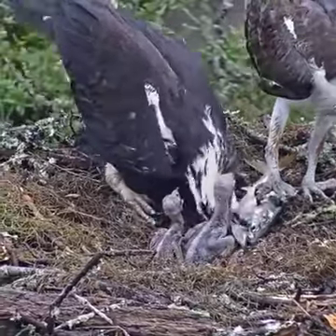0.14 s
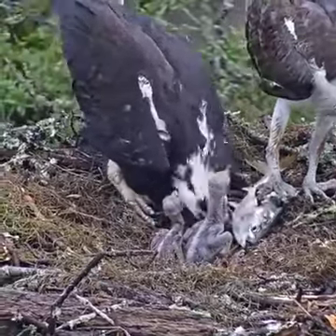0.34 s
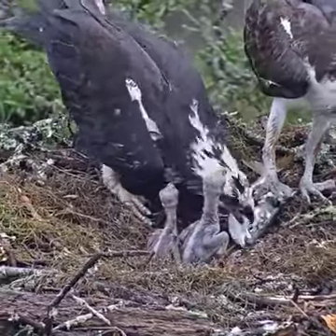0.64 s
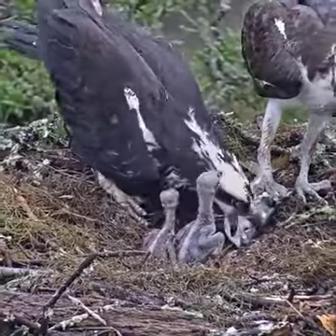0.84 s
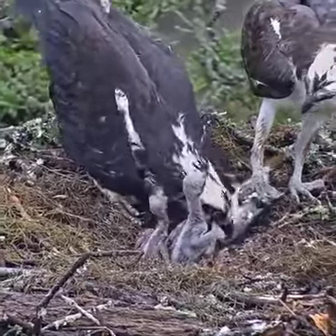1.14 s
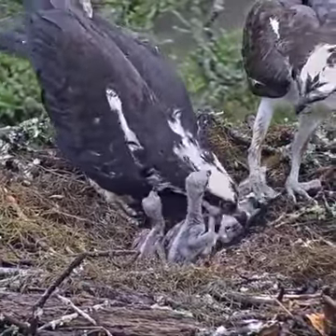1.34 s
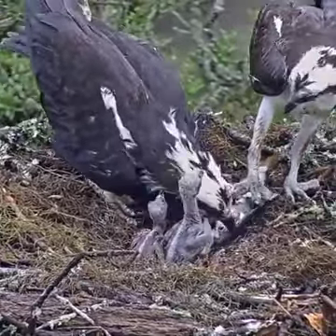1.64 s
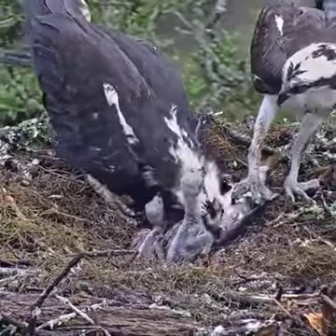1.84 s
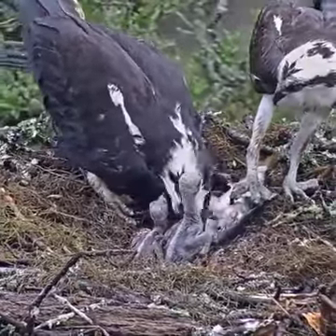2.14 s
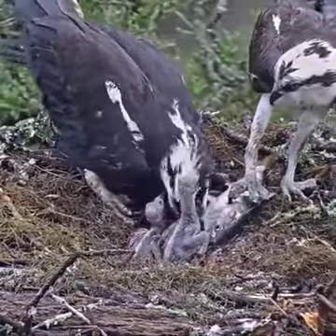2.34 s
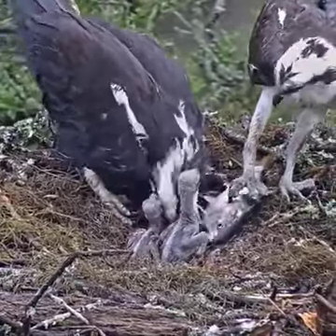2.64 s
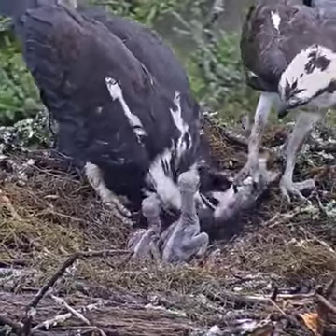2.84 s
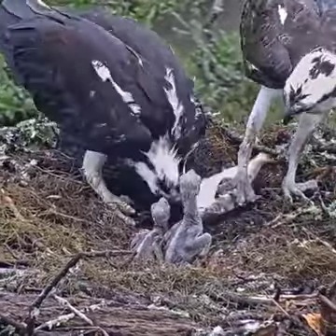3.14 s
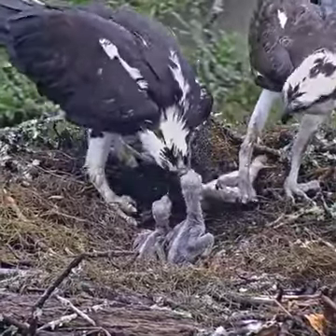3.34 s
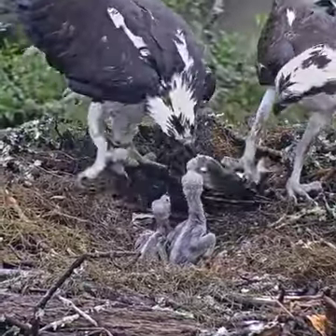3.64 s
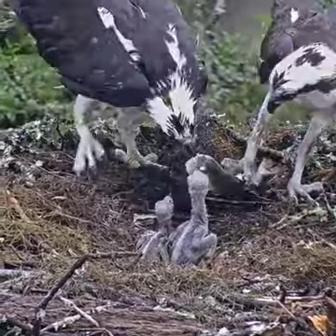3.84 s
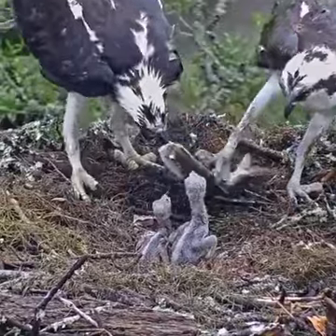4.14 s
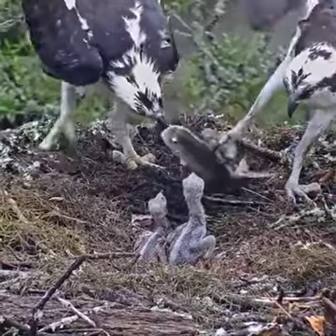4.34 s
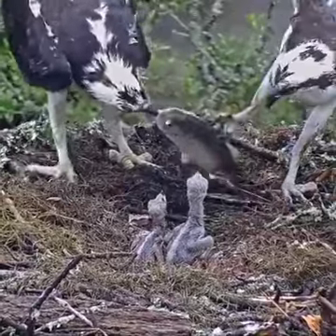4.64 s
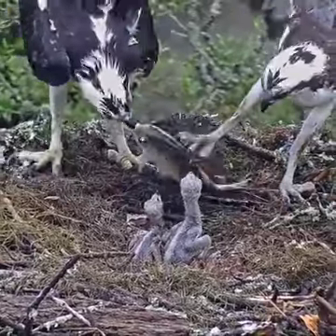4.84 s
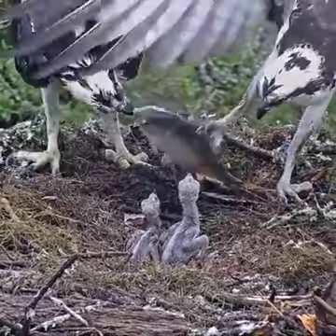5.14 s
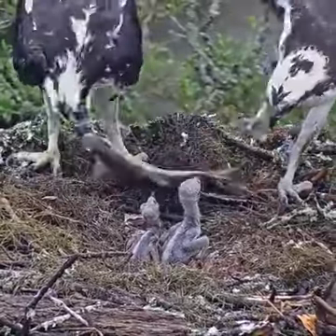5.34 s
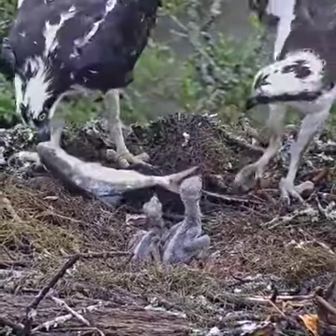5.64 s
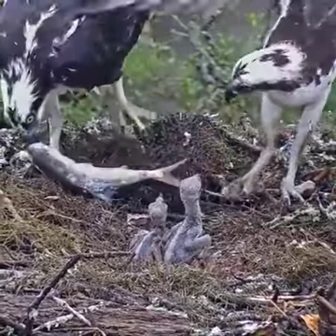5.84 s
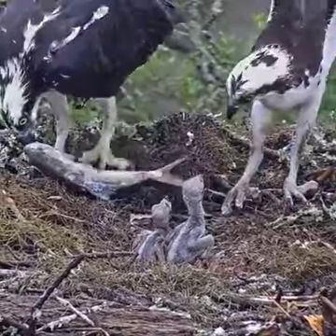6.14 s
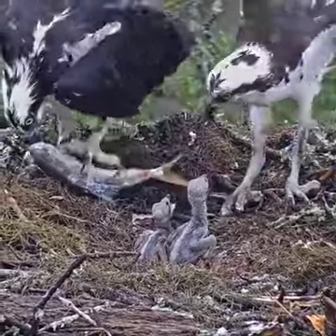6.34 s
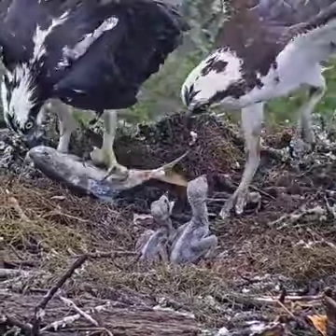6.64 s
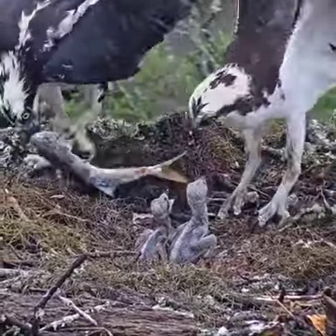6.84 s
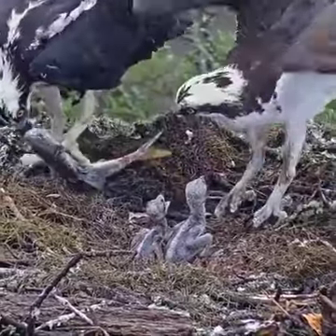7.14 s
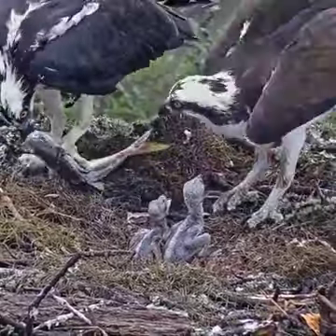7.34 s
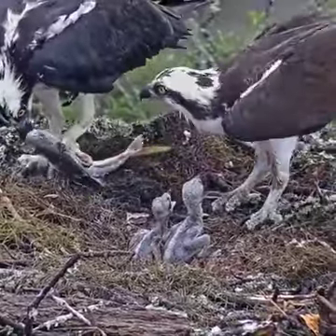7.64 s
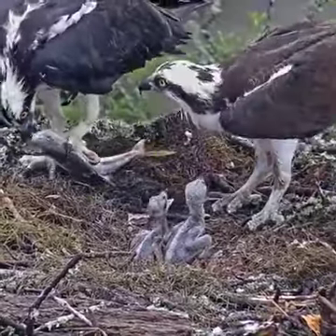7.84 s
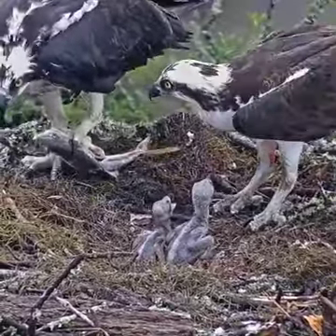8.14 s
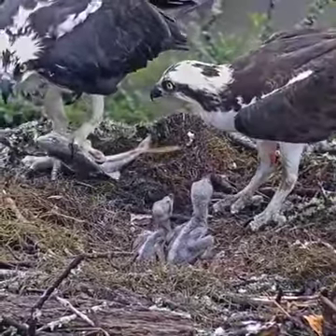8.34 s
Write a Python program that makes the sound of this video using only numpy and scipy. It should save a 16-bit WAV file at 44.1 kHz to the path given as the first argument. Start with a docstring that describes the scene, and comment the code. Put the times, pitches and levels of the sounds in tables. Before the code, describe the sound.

Ospreys at a stick nest whistle sharply, flipping between two pitches, over chick peeps, a toad's pulsed trill and steady hiss.

```python
"""Ospreys squabbling on a stick nest

Chicks peep, something scrapes and snaps with a hard ring, adults whistle and yelp: birds are jittered near-sine
notes, scrapes and snaps are struck resonances. Whistles flip abruptly between two registers. In the marsh
below, a toad trills as a pulsed tone over a far chorus of peeps; filtered noise and sines make hiss and hum. A
clipping microphone, a gain control that lifts quiet passages and a lopsided amplifier colour it all."""
import sys
import numpy as np
from scipy import signal
from scipy.fft import rfft, irfft, next_fast_len
from scipy.io import wavfile
from scipy.ndimage import uniform_filter1d, minimum_filter1d

SR = 44100
rng = np.random.default_rng(int(sys.argv[2]) if len(sys.argv) > 2 else 0)


def store_pcm(level_fs):
    """Save levels as 16-bit WAV."""
    pcm = np.round(np.clip(level_fs, -1, 1) * 32767).astype(np.int16)
    wavfile.write(sys.argv[1], SR, np.atleast_2d(pcm).T)


N = 374409
TIME = np.arange(N) / SR


def from_db(db):
    """Decibels to amplitude factor."""
    return 10 ** (np.asarray(db) / 20)


def rms_one(x):
    """Scale to rms 1."""
    return x / np.sqrt(np.mean(x ** 2) + 1e-20)


def filtered(x, kind, hz, order=2):
    """Butterworth filter."""
    return signal.sosfilt(signal.butter(order, hz, kind, fs=SR, output="sos"), x)


def drift(hz, size=N):
    """Random wander below a cutoff, spread about 1."""
    return rms_one(filtered(rng.standard_normal(size + SR), "low", hz))[SR:]


def noise(spectrum):
    """Gaussian noise with the given spectral shape; rms 1."""
    hz, db = np.transpose(spectrum)
    size = next_fast_len(N)
    bins_hz = np.maximum(np.fft.rfftfreq(size, 1 / SR), 1)
    colour = from_db(np.interp(np.log(bins_hz), np.log(hz), db))
    return rms_one(irfft(colour * rfft(rng.standard_normal(size)))[:N])


def add(track, start_s, sound):
    """Mix a sound into a track in place."""
    at = max(round(start_s * SR), 0)
    track[at:at + len(sound)] += sound[:N - at]


def clock(length_s):
    """Seconds since the start of a note; at least 5 ms long."""
    return np.arange(max(round(length_s * SR), SR // 200)) / SR


def arch(three, t):
    """A parabola through the values at start, middle and end."""
    return np.polyval(np.polyfit([0, .5, 1], three, 2), t / t[-1])


def note(t, pitch_hz, level_db, overtones_db, jitter, flutter_db, flutter_hz, edge_s):
    """One syrinx note: fundamental plus weighted harmonics, with random pitch jitter and level flutter."""
    phase = 2 * np.pi * np.cumsum(pitch_hz * (1 + jitter * drift(220, len(t)))) / SR
    tone = np.sin(phase)
    for k, db in enumerate(overtones_db, 2):
        tone = tone + from_db(db) * np.sin(k * phase)
    to_edge_s = np.minimum(t, t[-1] - t)
    gate = np.sin(np.pi / 2 * np.clip(to_edge_s / edge_s, 0, 1)) ** 2
    return np.sqrt(2) * tone * gate * from_db(level_db + flutter_db * drift(flutter_hz, len(t)))


def echoes(x, t60_s, delay_s):
    """Scattered, dying reflections from branches and trees: convolution with decaying noise."""
    t = np.arange(SR) / SR
    tail = rng.standard_normal(SR) * from_db(-60 * t / t60_s) * (t > delay_s)
    return signal.fftconvolve(x, tail / np.linalg.norm(tail))[:N]


# Chick peeps, nominal: (start [s], end [s], mid pitch [Hz], glide from start to end [Hz],
# level [dB], hoarseness [0-1])
CHICK_PEEPS = [(0, .079, 2790, -30, -29.5, 0), (.085, .13, 2620, -250, -34, .24),
               (.123, .238, 2570, 0, -40, .88), (.238, .305, 3100, 0, -47, 1),
               (.338, .465, 2770, -240, -33, .2), (.471, .577, 2760, -30, -42.5, .5),
               (.487, .518, 2330, -200, -44, .2), (1.32, 1.41, 2750, 100, -42, .5),
               (3.12, 3.262, 3000, 1000, -54, .35), (3.266, 3.44, 3450, 700, -53.5, .18),
               (3.29, 3.45, 2790, -40, -46, .11), (3.749, 3.818, 3150, -100, -37, 0),
               (3.863, 3.896, 2450, -60, -28, .65), (4.048, 4.11, 3400, 30, -34.5, .2),
               (4.175, 4.199, 2560, 200, -31, .42), (4.355, 4.463, 3200, -200, -37.5, .12),
               (4.514, 4.543, 2520, -500, -31.5, .6), (4.885, 4.965, 2800, -110, -29.5, .19),
               (5.405, 5.5, 3190, 600, -40, 1), (5.987, 6.041, 3250, 1200, -41, 1),
               (6.264, 6.343, 3100, 900, -41, 1), (7.09, 7.23, 3000, 700, -48.5, .35),
               (7.24, 7.347, 3500, 370, -48.5, .3), (7.415, 7.445, 3400, -700, -48.5, .3),
               (7.474, 7.542, 2600, 290, -50, .36), (7.88, 7.97, 3780, 0, -56, .3),
               (7.9, 7.97, 2640, 100, -46, .5), (7.69, 7.782, 2690, -60, -44, .15),
               (7.805, 7.856, 2430, -280, -45, .3), (7.987, 8.045, 3560, 0, -47.5, .2),
               (8.02, 8.09, 2770, 0, -42, .2), (8.098, 8.148, 2730, -200, -37.5, .3),
               (8.16, 8.33, 2690, -100, -43, .55), (8.09, 8.138, 3430, 0, -49, .1),
               (8.153, 8.207, 2450, -370, -43.5, .3), (8.155, 8.21, 3530, 400, -48, .3),
               (8.22, 8.385, 4230, -200, -59, .3), (8.35, 8.438, 3140, 250, -35, .25),
               (8.357, 8.48, 2780, -60, -37.5, .2)]
REST_HZ, PEEP_ARCH = 2600, .4   # a peep's ends hang back towards the resting pitch by this share


def chicks(quaver_db=2.5, quaver_hz=120, overtone_db=-28):
    """Thin arched peeps with an uneven quaver; fast random pitch wobble makes them hoarse."""
    out = np.zeros(N)
    for start_s, end_s, hz, glide_hz, db, hoarse in CHICK_PEEPS:
        t = clock(end_s - start_s + .009)
        ends_hz = hz - PEEP_ARCH * (hz - REST_HZ)
        pitch_hz = arch([ends_hz - glide_hz / 2, hz, ends_hz + glide_hz / 2], t)
        level_db = db + arch([-3, 1, -4.5], t)
        wobble = .003 + .07 * hoarse ** 2
        add(out, start_s - .004, note(t, pitch_hz, level_db, [overtone_db], jitter=wobble,
                                      flutter_db=quaver_db, flutter_hz=quaver_hz, edge_s=.009))
    return out


# Hiss spectral shape: (frequency [Hz], relative density [dB])
HISS_SHAPE = [(25, -10.5), (60, -0.5), (150, -4), (400, -4), (850, -6.5), (1250, -13), (1750, -11),
              (2300, 2), (2750, 6), (3700, -4), (4600, -20), (7000, -27.5), (8600, -52.5), (15000, -58)]
# Electrical hum, before the gain control: (frequency [Hz], rms level [dB])
HUM_TONES = [(102.3, -65), (204.6, -72), (290.7, -70), (349.9, -70.5), (409.1, -74.5), (538.3, -71.5),
             (721.4, -81.5), (818.3, -79), (962, -71), (1558, -87.5)]
HISS_DB = -49.7


def background():
    """Hiss peaking near 2.7 kHz with a slow level waver, plus hum sines with wandering phase."""
    hum = np.zeros(N)
    for hz, db in HUM_TONES:
        cycles = hz * TIME + rng.random()
        hum += from_db(db) * np.sqrt(2) * np.sin(2 * np.pi * cycles + 0.78 * drift(4))
    return from_db(HISS_DB + 0.41 * drift(9.2)) * noise(HISS_SHAPE) + hum


CHORUS_DB = -55.5


def chorus(centre_hz=2730, spread=.022, count=170):
    """Many far, small peeps overlap around one pitch; rms 1."""
    out, t = np.zeros(N), clock(.093)
    for when, (tuning, glide, strength) in zip(rng.random(count), rng.standard_normal((count, 3))):
        pitch_hz = centre_hz * (1 + spread * tuning + .02 * glide * arch([1, 0, -1], t))
        level_db = 2 * strength + arch([-3, 0, -3], t)
        add(out, when * N / SR, note(t, pitch_hz, level_db, [-26], jitter=.005,
                                     flutter_db=4, flutter_hz=120, edge_s=0.013))
    return rms_one(out)


# Ringing resonances, struck or scraped: (frequency [Hz], relative level [dB], t60 [s])
RING_MODES = [(956, -18, 0.07), (1526, -20.5, 0.17), (1830, -23, 0.018), (2003, -15, 0.036),
              (2400, 6, 0.0058), (2740, -4, 0.0076), (3600, -11.5, 0.006), (5760, -21.5, .003)]


def ring(clicks):
    """Parallel two-pole resonators rung by clicks."""
    out = np.zeros(N)
    for hz, db, t60_s in RING_MODES:
        r, w = from_db(-60 / (t60_s * SR)), 2 * np.pi * hz / SR
        poles = [1, -2 * r * np.cos(w), r * r]
        out += from_db(db) * signal.lfilter([0, np.sin(w)], poles, clicks + 1e-18)
    return out


# Scraping rubs: (start [s], end [s], nominal peak level [dB])
SCRAPES = [(0.08, 0.273, -53), (0.26, 0.386, -45.5), (1.03, 1.15, -39), (1.298, 1.47, -46),
           (3.03, 3.135, -53), (5.515, 5.69, -54), (7.38, 7.433, -50)]
# Single sharp snaps that ring the same modes: (time [s], relative strength [dB])
SNAPS = [(1.117, -21), (3.129, -33.5), (6.02, -42), (6.878, -41.5), (7.388, -38.5), (7.396, -40),
         (7.404, -36), (7.414, -38), (8.15, -38)]


def scrapes_and_snaps(slips_per_s=900):
    """Dense random slips (scrapes) and single clicks (snaps) excite the same ringing modes."""
    snaps, pressure = np.zeros(N), np.zeros(N)
    for start_s, db in SNAPS:
        add(snaps, start_s, from_db([db]) / 2)
    for start_s, end_s, db in SCRAPES:
        size = max(round((end_s - start_s) * SR), 2)
        add(pressure, start_s, from_db(db) * np.hanning(size))
    slips = (rng.random(N) < slips_per_s / SR) * rng.standard_normal(N)
    return ring(snaps) + pressure * rms_one(ring(slips))


# Per register, shares of the pitch: it scoops up as the breath builds and droops as it runs out
SCOOP, HIGH_SCOOP, DROOP = .085, .03, .095


def bend(share, scoop, droop):
    """Pitch factor on the way through one register: a scoop up, a plateau, a droop."""
    share = np.clip(share, 0, 1)
    return 1 - scoop * (1 - share) ** 2.5 - droop * share ** 5


ACCENT_S, SWELL_DB, SWELL_S = .016, 6, .013   # decay of the opening accent; swell to full strength
RELEASE_DB, RELEASE_S, WAVER_DB = 12, .011, .8   # the breath gives out at the end; slow unevenness
BREAK_S, BREAK_DIP_DB, BREAK_DIP_S = .0015, 6, .004   # sudden flip; the voice falters around the flip up
SECOND_DB, HIGH_PURER_DB = -29.5, 3   # second harmonic; the high register has less of it
SAG_AT, SAG_WIDTH = .35, .27   # where a held high note sags, shares of its length
# Flipping back lands on a quickly dying pop; level relative to the high register
TAIL_HZ, TAIL_DB, TAIL_FADE_DB_PER_S = 2600, 1, 400


def whistle(start_s, end_s, hz, db, accent_db, bow, *flip):
    """One call: it starts in the low register and may break into the high one and back."""
    t = clock(end_s - start_s + .003)
    now_s = start_s + t
    pitch_hz = hz * bend(t / t[-1], bow * SCOOP, bow * DROOP)
    second_db = SECOND_DB
    level_db = db + accent_db * np.exp(-t / ACCENT_S) - SWELL_DB * np.exp(-t / SWELL_S)
    if flip:
        up_s, back_s, high_hz, high_db, growth_db, sag = flip
        # crossfade weights of low register, high register and tail
        risen = np.clip((now_s - up_s) / BREAK_S + .5, 0, 1)
        fallen = np.clip((now_s - back_s) / BREAK_S + .5, 0, 1)
        low, high = 1 - risen, risen - fallen
        through = np.clip((now_s - up_s) / (back_s - up_s), 0, 1)
        since_back_s = now_s - back_s

        low_pitch_hz = hz * bend(t / (up_s - start_s), bow * SCOOP, 0)
        sagging = sag * np.exp(-((through - SAG_AT) / SAG_WIDTH) ** 2)
        high_pitch_hz = high_hz * (bend(through, HIGH_SCOOP, bow * DROOP) - sagging)
        tail_pitch_hz = TAIL_HZ * (1 - DROOP * since_back_s / (end_s - back_s))
        pitch_hz = low * low_pitch_hz + high * high_pitch_hz + fallen * tail_pitch_hz

        tail_db = TAIL_DB + min(growth_db, 0) - TAIL_FADE_DB_PER_S * since_back_s
        level_db = low * level_db + risen * high_db + high * growth_db * (through - .5) + fallen * tail_db
        level_db = level_db - BREAK_DIP_DB * np.exp(-np.abs(now_s - up_s) / BREAK_DIP_S)
        second_db = SECOND_DB - high * HIGH_PURER_DB
    level_db = level_db + WAVER_DB * drift(20, len(t)) - RELEASE_DB * np.exp((t - t[-1]) / RELEASE_S)
    return note(t, pitch_hz, level_db, [second_db], jitter=.0055,
                flutter_db=.45, flutter_hz=71, edge_s=.0045)


# Adult whistles, nominal: (start [s], end [s], pitch [Hz], level [dB], opening accent [dB],
# pitch bow [factor on scoop and droop]); if the call flips register, also: (flip up [s], flip back [s],
# high pitch [Hz], high level [dB], growth while high [dB], sag [share of high pitch])
ADULT_WHISTLES = [(0.795, 0.999, 2600, -24, 26, .8, 0.896, 0.992, 3510, -21.5, 10, 0),
                  (1.103, 1.288, 2640, -19, 0, 1.3, 1.132, 1.27, 3510, -19, -9, 0),
                  (1.421, 1.588, 2800, -19, 3, 1.4, 1.467, 1.578, 3610, -22, 0, .04),
                  (2.797, 3.03, 2650, -26, 9, 1, 2.882, 3.012, 3530, -21, 3, .01),
                  (3.45, 3.48, 2440, -16, 6, .2),
                  (3.476, 3.652, 2990, -16, 3, .6, 3.508, 3.633, 3350, -14.5, .5, .03),
                  (3.884, 4.047, 2700, -14, 0, .7, 3.994, 4.025, 3380, -14, -5, 0),
                  (4.194, 4.35, 2860, -12.5, 0, .9, 4.285, 4.337, 3465, -11.5, 0, 0),
                  (4.54, 4.69, 2855, -11.3, 0, 1.25),
                  (4.838, 5.006, 2850, -10.5, 0, 1.1, 4.882, 4.986, 3680, -14, 0, .1),
                  (5.164, 5.293, 2830, -11.7, 0, 1.1), (5.694, 5.87, 2815, -11.5, 0, .9),
                  (6.024, 6.184, 2825, -14.5, 0, 1, 6.125, 6.17, 3560, -14, 0, 0),
                  (6.353, 6.511, 2810, -15, 3, 1.1, 6.445, 6.499, 3550, -18.5, 10, 0),
                  (6.898, 7.021, 2598, -15.5, 8, .35)]


def whistles():
    """Near-pure syrinx calls, many breaking between two registers."""
    out = np.zeros(N)
    for row in ADULT_WHISTLES:
        add(out, row[0] - .002, whistle(*row))
    return out


# Low yelps, nominal: (start [s], end [s], mid pitch [Hz], mid level [dB],
# second harmonic re fundamental [dB])
ADULT_YELPS = [(0.81, 0.876, 2100, -29.5, 0.5), (1.95, 2.004, 2050, -30.5, 2), (2.977, 3.043, 2020, -37, 3),
               (4.048, 4.118, 2090, -31.5, -5.5), (5.503, 5.548, 1950, -40, 4.5),
               (7.541, 7.606, 2090, -27, -5)]
YELP_RISE, YELP_FALL = .005, .13   # start and end pitch below the middle, shares
YELP_ATTACK_DB, YELP_FADE_DB = 7, 11   # start and end level below the middle


def yelps():
    """Short notes, lower and richer in harmonics than the whistles, falling in pitch."""
    out = np.zeros(N)
    for start_s, end_s, hz, db, second_db in ADULT_YELPS:
        t = clock(end_s - start_s + .006)
        pitch_hz = hz * arch([1 - YELP_RISE, 1, 1 - YELP_FALL], t)
        level_db = db - arch([YELP_ATTACK_DB, 0, YELP_FADE_DB], t)
        add(out, start_s - .002, note(t, pitch_hz, level_db, [second_db, second_db - 31], jitter=0.0074,
                                      flutter_db=1.15, flutter_hz=90, edge_s=0.0059))
    return out


# Grit spectral shape: (frequency [Hz], relative density [dB])
GRIT_SHAPE = [(25, 12.5), (60, 10), (200, -17), (700, -10), (1400, -28), (2700, 5), (4200, -9.5),
              (6500, -13.5), (9000, -20), (15000, -32)]
GRIT_DB = -31.5   # re the voice


def adults():
    """Whistles and yelps, with faint noise following their short-term rms."""
    voice = whistles() + yelps()
    envelope = np.sqrt(np.abs(uniform_filter1d(voice ** 2, size=200)))
    return voice + from_db(GRIT_DB) * envelope * noise(GRIT_SHAPE)


TRILL_START_S, TRILL_END_S, TRILL_DB = 1.381, 5.56, -37.5
TRILL_ATTACK_S, TRILL_ATTACK_DB, TRILL_RELEASE_S, TRILL_FADE_DB_PER_S = .42, 20, .06, .9
TRILL_HZ, TRILL_RISE_HZ, TRILL_SAG_HZ_PER_S = 2155, 400, 20
# rate approached, surplus at the start, time scale of its loss
PULSES_PER_S, EXTRA_PULSES_PER_S, SLOWING_S = 53, 9.5, 1.05


def toad(pulse_share=0.5, far_db=-9, second_db=-25, third_db=-37, uneven=.02):
    """The vocal sac rings at one pitch, chopped into pulses; after swelling it slows, sags, fades and dulls."""
    age_s = np.maximum(TIME - TRILL_START_S, 0)
    slack = np.maximum(1 - age_s / TRILL_ATTACK_S, 0) ** 1.4   # the sac is still filling
    hz = TRILL_HZ - TRILL_RISE_HZ * slack - TRILL_SAG_HZ_PER_S * age_s
    effort = from_db(-TRILL_ATTACK_DB * slack - TRILL_FADE_DB_PER_S * age_s)
    per_s = PULSES_PER_S + EXTRA_PULSES_PER_S * np.exp(-(age_s / SLOWING_S) ** 2)
    cycle = np.cumsum(per_s * (1 + uneven * drift(30))) / SR % 1
    pulse = np.sin(np.pi * np.minimum(cycle / pulse_share, 1) ** 0.76) ** 1.3   # quick swell, slower fall
    phase = 2 * np.pi * np.cumsum(hz * (1 + .002 * drift(60))) / SR
    overtones = from_db(second_db) * np.sin(2 * phase) + from_db(third_db) * np.sin(3 * phase)
    tone = np.sin(phase) + effort * pulse * overtones
    gate = (age_s > 0) * np.clip((TRILL_END_S - TIME) / TRILL_RELEASE_S, 0, 1)
    trill = rms_one(pulse * tone) * effort * gate * from_db(TRILL_DB + 1.0 * drift(42))
    return trill + from_db(far_db) * echoes(trill, t60_s=0.22, delay_s=0.024)


def scene():
    """Nest with close echoes, marsh, and steady background."""
    nest = chicks() + scrapes_and_snaps() + adults()
    nest_echoes = from_db(-16.5) * echoes(nest, t60_s=.15, delay_s=0.0055)
    marsh = from_db(CHORUS_DB) * chorus() + toad()
    return (nest + nest_echoes + marsh + background())[None]


def microphone(x, limit=0.38, softness=.09, rumble_hz=45, top_hz=7500):
    """The capsule flattens loud swings on one side: whistles mix with the toad and thump at their edges."""
    flattened = softness * np.logaddexp(0, (-x - limit) / softness)
    return filtered(x + filtered(flattened, "high", rumble_hz), "low", top_hz, order=18)


def gain_control(x, knee_db=-15, slope=0.72, most_db=21, release_db_per_s=78, attack_hz=70):
    """Lifts quiet passages; gain drops in milliseconds, holds after sustained overload, climbs back."""
    def meter_db(size, origin):
        return 10 * np.log10(np.abs(uniform_filter1d(x ** 2, size, origin=origin)) + 1e-12)
    quick, slow, hold, overload_db = SR // 240, SR // 25 | 1, SR // 3 | 1, -15.8   # windows in samples
    # loudest sustained level of the last third of a second; discounted when below overload
    recent_db = -minimum_filter1d(-meter_db(slow, slow // 2), hold, origin=hold // 2)
    held_db = np.minimum(recent_db, recent_db + 8 * (recent_db - overload_db))
    level_db = np.maximum(meter_db(quick, 0), held_db)
    release_db = release_db_per_s * TIME
    level_db = np.maximum.accumulate(level_db + release_db) - release_db
    lift_db = np.clip(slope * (knee_db - level_db), 0, most_db)
    return x * from_db(lift_db[0] + filtered(lift_db - lift_db[0], "low", attack_hz, order=1))


def amplifier(x, lopsided=.09, straight_below=.1, rumble_hz=30, top_hz=7300):
    """Slightly lopsided stage: loud signals gain octave and difference tones."""
    bent = lopsided * (np.hypot(x, straight_below) - straight_below)
    return x + filtered(filtered(bent, "high", rumble_hz), "low", top_hz, order=12)


CUTOFF_HZ = 15700   # stopband edge


def record(dry, offset=-0.0058, self_noise_db=-81):
    """Microphone, gain control, amplifier, circuit noise, DC offset and a steep low-pass."""
    out = amplifier(gain_control(microphone(dry[0])))
    out = out + from_db(self_noise_db) * rng.standard_normal(N) + offset
    return signal.sosfilt(signal.cheby2(12, 70, CUTOFF_HZ, fs=SR, output="sos"), out)[None]


dry = scene()
out = record(dry)
store_pcm(out)
```